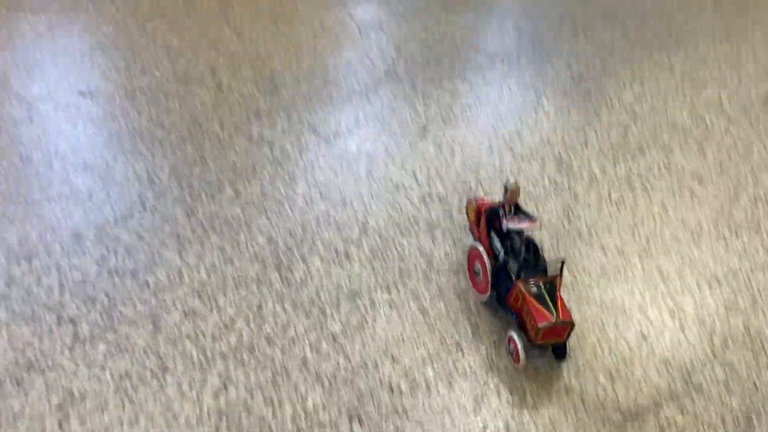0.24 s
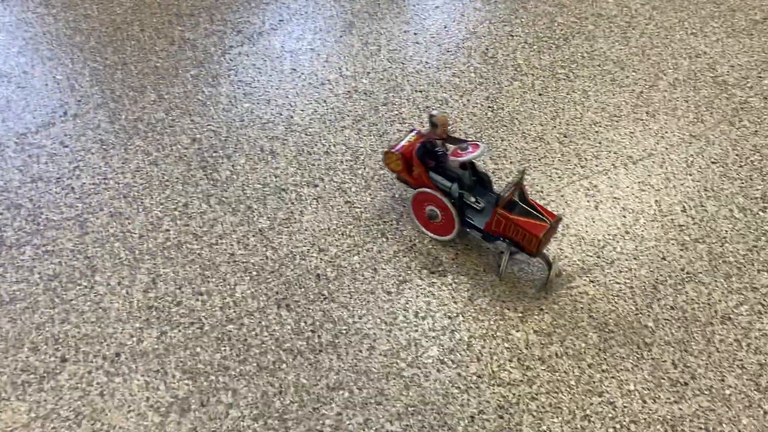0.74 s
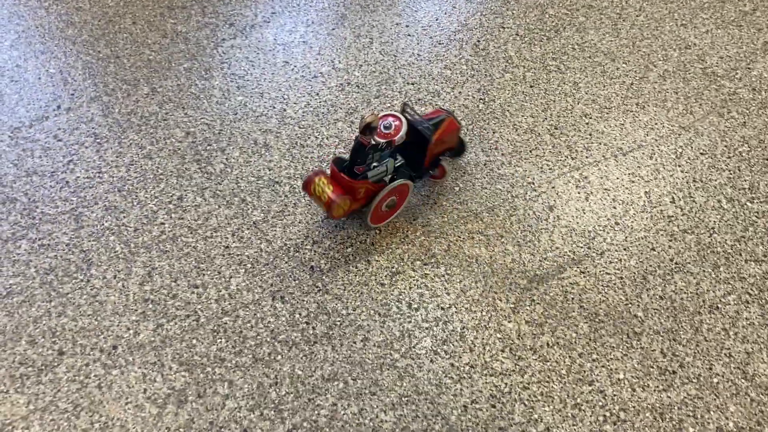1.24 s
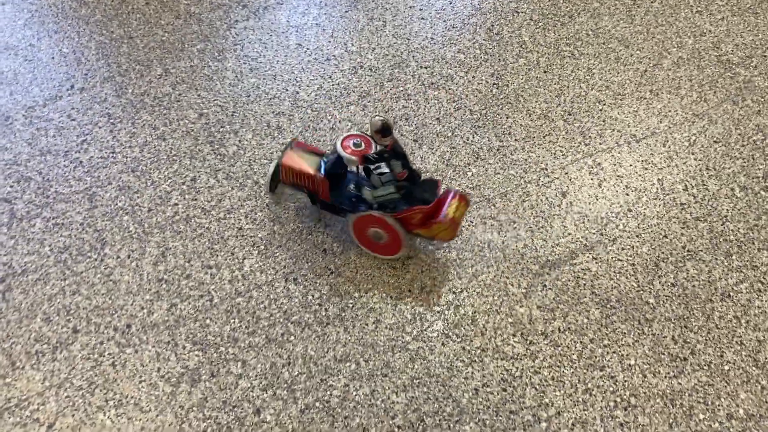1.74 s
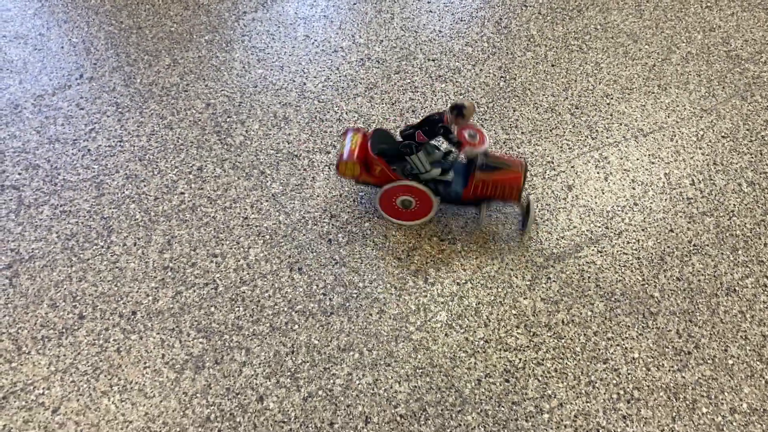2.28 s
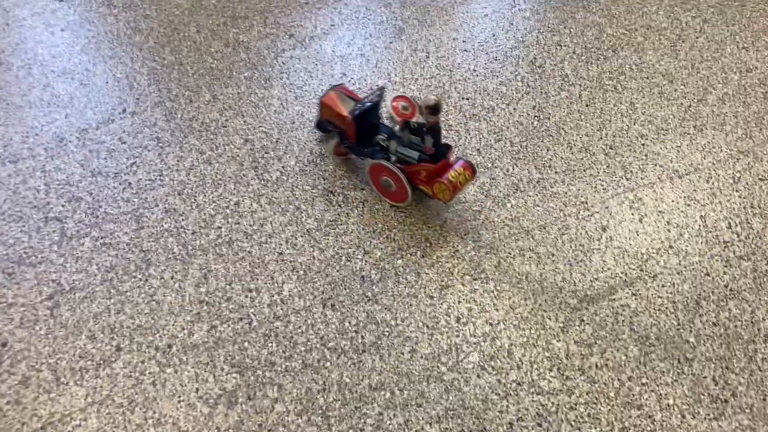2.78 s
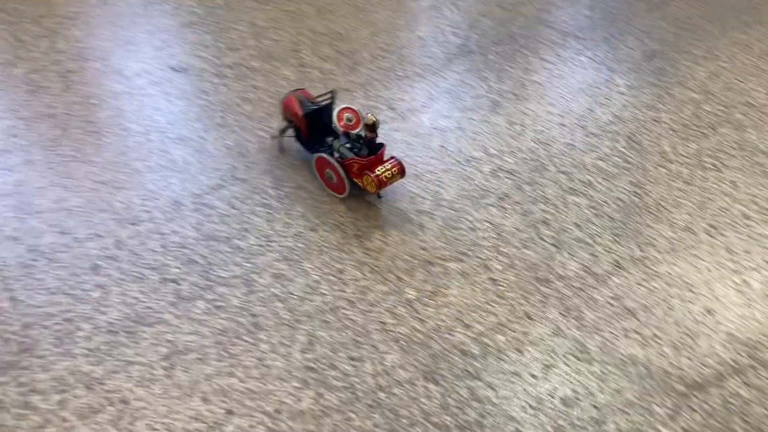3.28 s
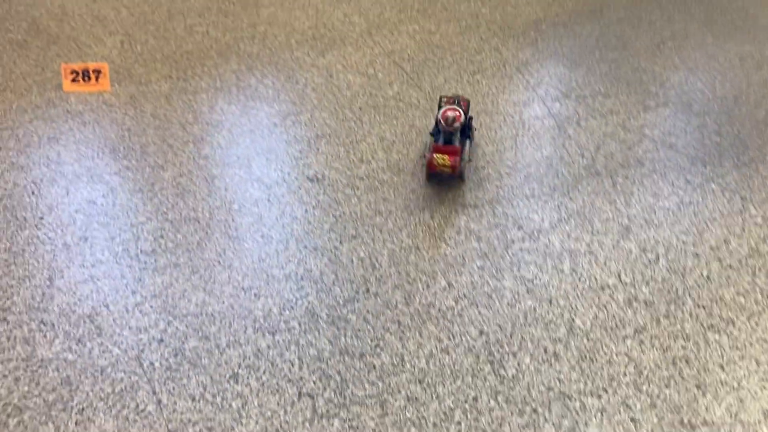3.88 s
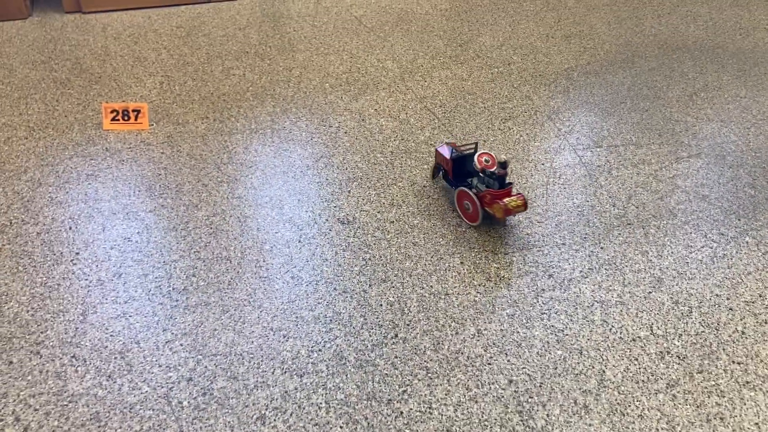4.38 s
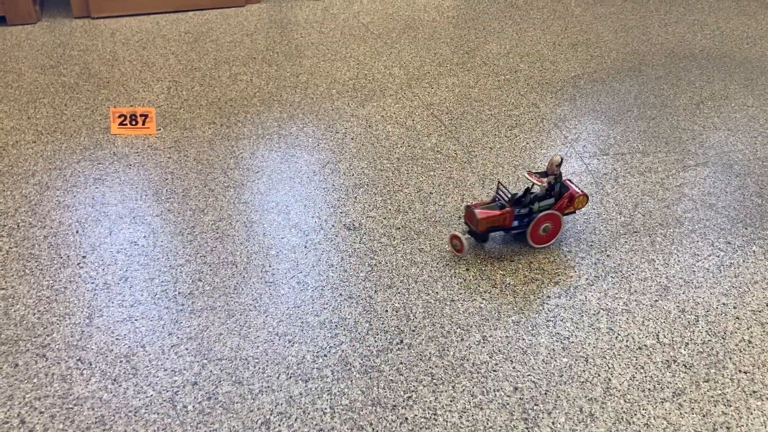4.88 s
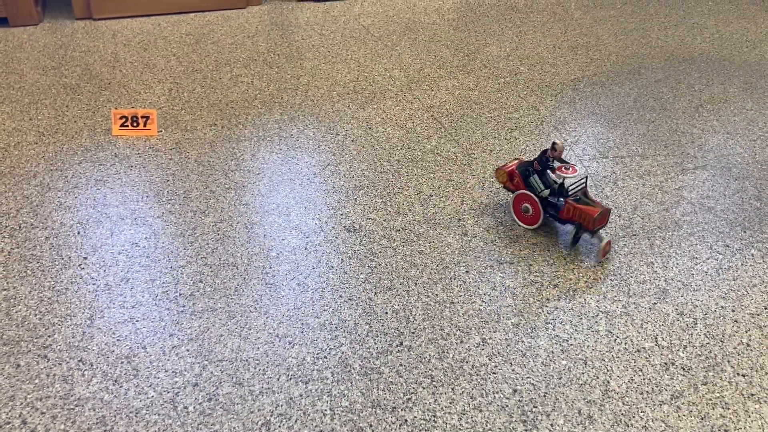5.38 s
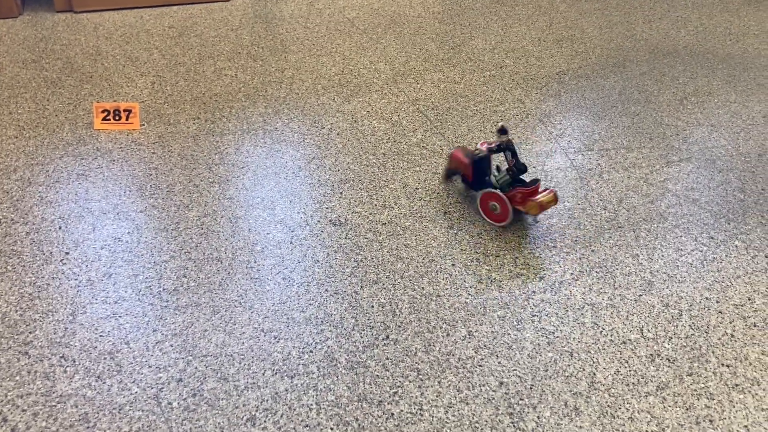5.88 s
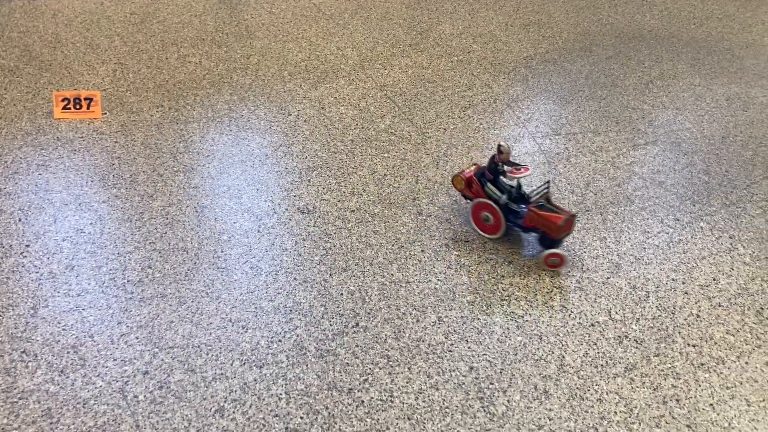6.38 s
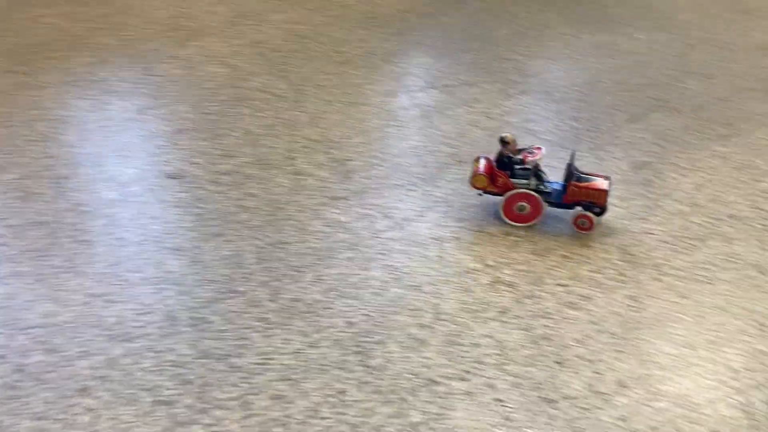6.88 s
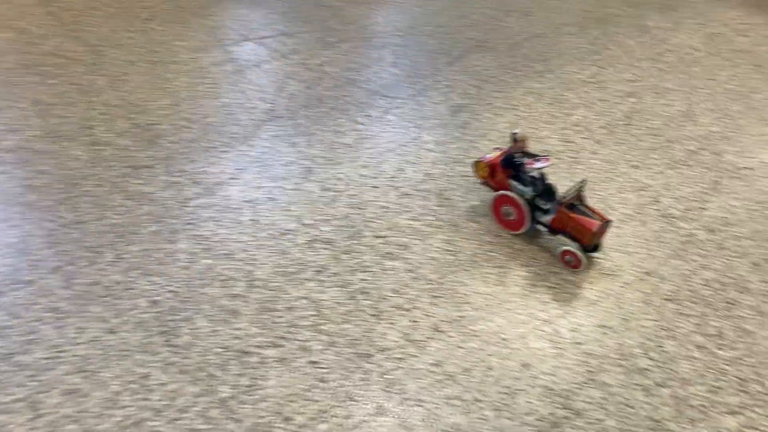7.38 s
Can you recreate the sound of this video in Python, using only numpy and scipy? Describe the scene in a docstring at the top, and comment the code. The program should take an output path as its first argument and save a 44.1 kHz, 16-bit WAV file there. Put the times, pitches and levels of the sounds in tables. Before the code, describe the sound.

Loose tin panels buzz and clockwork gears tick as a small toy car scurries around a hall, with bright clacks over faint low hum.

```python
"""A clockwork tin car scurries on a hard floor: loose panels rattle as random contacts on ringing tin, nearly
dying away midway; gears whirr and tick, their strikes driving shell resonances, and wheels grind.
Now and then the front drops with a clack, a bright crack over a body knock, and single loose parts snap.
The hall answers with a soft noise tail. Behind it are air noise, sine hums from machinery,
and a far drone with a lumpy rumble, which rises in pitch and then fades."""
import sys
import numpy as np
from scipy import signal
from scipy.fft import rfft, irfft, next_fast_len
from scipy.io import wavfile
from scipy.ndimage import uniform_filter1d, map_coordinates

SR = 44100
rng = np.random.default_rng(int(sys.argv[2]) if len(sys.argv) > 2 else 0)


def generate_wav(signal):
    """Clip the signal to [-1, 1] and save it as 16-bit WAV at the path in sys.argv[1]."""
    frames = np.transpose(np.atleast_2d(signal))
    scaled = np.clip(frames, -1, 1) * 32767
    pcm = np.round(scaled).astype(np.int16)
    wavfile.write(sys.argv[1], SR, pcm)


N = 336902  # samples

# colour of loose tin panels, rattling or snapping: (frequency [Hz], relative level [dB])
PANEL_COLOUR = [(1000, -31), (3000, -18), (4500, -18), (5400, -10), (6200, -16), (6900, -2.5), (7700, -3),
                (8600, 1), (9400, -9), (11000, -0.5), (12200, -7), (12700, -10.5), (14200, -29),
                (15200, -9.5), (15900, -10)]
# colour of the body's knock: (frequency [Hz], relative level [dB])
KNOCK_COLOUR = [(250, -18.5), (700, -27), (1100, -7), (1800, 0.5), (2500, -1), (3400, 1.5), (4800, 5),
                (6000, -1), (8000, -27), (14000, -44)]
# far drone: (time [s], pitch [Hz], level [dB], octave relative to it [dB])
FAR_DRONE = [(0, 72.3, -70, -16), (.45, 70.6, -48, -19), (1.2, 73.57, -49, -13), (2, 73.7, -47, -21),
             (2.9, 77.24, -49.5, -16.5), (3.45, 77.8, -45, -11.5), (3.65, 80, -59, 2.5),
             (3.9, 79, -85, 5.5)]


def amp(db):
    """Decibels to gain."""
    return 10 ** (np.asarray(db) / 20)


def unit(x):
    """Scaled to rms 1."""
    return x / np.sqrt(np.mean(x ** 2) + 1e-20)


def along(points, hz):
    """(Hz, value) points read on a log frequency axis."""
    f, v = np.transpose(points)
    return np.interp(np.log(hz + 1), np.log(f + 1), v)


def curves(rows):
    """One value per sample for each column after the time."""
    s, *cols = np.transpose(rows)
    return [np.interp(np.arange(N) / SR, s, c) for c in cols]


def wobble(rate):
    """A smooth random curve, rate knots a second."""
    knots = rng.standard_normal(int(N * rate / SR) + 4)
    return map_coordinates(knots, [np.arange(N) * rate / SR])


def coloured(x, spectrum):
    """Causal, minimum-phase filter with the given spectrum; white noise keeps its power."""
    size = 2 * next_fast_len(N // 2 + 8192)
    gain = unit(amp(along(spectrum, np.fft.rfftfreq(size, 1 / SR))))
    cepstrum = irfft(np.log(gain))
    # folding the cepstrum onto positive time makes the filter causal
    cepstrum[1:size // 2] *= 2
    cepstrum[size // 2 + 1:] = 0
    response = np.exp(rfft(cepstrum))
    return irfft(rfft(x, size) * response, size)[..., :N]


def add(track, s, sound):
    """Mix a sound into a track at time s."""
    start = max(round(s * SR), 0)
    part = track[:, start:start + sound.shape[1]]
    part += sound[:, :part.shape[1]]


def held(s, length):
    """An envelope that rises quickly, holds and dies away."""
    attack_s, release_s = 0.0051, 0.093
    t = np.arange(N) / SR
    rise = np.clip((t - s) / attack_s, 0, 1)
    fall = np.clip((s + length - t) / release_s + .5, 0, 1)  # half way down at the end of the length
    return rise * fall


def running(shake_db, roll_db):
    """Shaking makes the panels louder and denser; with rolling it drives the gears; rolling alone the wheels."""
    panels_db, gears_db, wheels_db = -42, -52, -60.5  # each part in ordinary running, before the lifts
    panel_lift, gear_lift = lurches()
    jolt_db = -0.13 * wobble(23)  # random unevenness, 23 knots a second
    rattle_db = shake_db + panel_lift + jolt_db
    whirr_db = 0.34 * shake_db + 0.93 * roll_db + gear_lift + jolt_db
    contacts = 250 * amp(.25 * rattle_db)  # contacts a second
    parts = (amp(panels_db + rattle_db) * loose_panels(contacts)
             + amp(gears_db + whirr_db) * gear_train(contacts, shake_db)
             + amp(wheels_db + 1.06 * roll_db) * grinding_wheels())
    return spinning(parts, depth_db=2.0)


def loose_panels(contacts):
    """Loose panels tap the body at random, in contacts of very uneven size."""
    taps = chatter(contacts, scatter_db=4.8, clump_db=3, crack_t60=0.0046,
                   shiver_db=-14, ring_db=-29, count=14)
    return coloured(taps, PANEL_COLOUR)


def gear_train(contacts, shake_db):
    """Meshing gears whirr in dense, even contacts; each tooth ticks, and the strikes set the shell singing."""
    # colours of the mesh and of the ticks: (frequency [Hz], relative level [dB])
    whirr_colour = [(500, -26.5), (900, -9), (1250, -7), (1650, -2), (1950, -0.5), (2330, -6), (2600, -1),
                    (3100, -5), (3600, -10), (4300, -5), (5400, -10), (6200, -10.5), (8000, -14),
                    (14000, -48)]
    tick_colour = [(600, -19.5), (1200, -5.5), (1900, -2.5), (2350, -2), (3400, -3), (4400, -8),
                   (5400, -2.5), (6500, -11), (9000, 3), (14000, -25)]
    mesh = chatter(1.4 * contacts, scatter_db=1.5, clump_db=0.0, crack_t60=0.0031,
                   shiver_db=-10.5, ring_db=-30.5, count=10)
    at, size, shape = tooth_strikes()
    # the teeth strike more softly as the shaking dies
    tick_gain = amp(-1.5 + 0.067 * shake_db)
    ticking = tick_gain * coloured(teeth(at, size, shape, count=16), tick_colour)
    return amp(0.04) * coloured(mesh, whirr_colour) + ticking + singing(at, size)


def tooth_strikes():
    """Worn gear teeth catch one after another, nearly evenly: sample, size and shape of each strike."""
    rate = 96  # strikes a second, about which the speed wavers
    slip_share, scatter_db = .15, 5  # timing scatter (share of a tooth), size scatter
    turned = np.cumsum(rate * amp(1.5 * wobble(5))) / SR
    at = np.flatnonzero(np.diff(np.floor(turned)))
    slip, size, shape = rng.standard_normal((len(at), 3)).T
    at = np.clip(at + slip_share * slip * SR / rate, 0, N - 1).astype(int)
    return at, unit(amp(scatter_db * np.clip(size, -2, 1.6))), shape


def teeth(at, size, shape, count):
    """The crisp tick of each tooth against the tin, in count shapes; rms 1."""
    out = np.zeros((2, N))
    for group in np.array_split(np.argsort(shape), count):
        tick = strike(crack_t60=0.0087, shiver_db=-22, ring_db=-30, rise=0.0002)
        impulses = np.bincount(at[group], size[group], N)
        out += signal.oaconvolve(impulses[None], tick, axes=1)[:, :N]
    return unit(out)


def singing(at, size):
    """The noisy buzz of the tooth strikes drives the shell's resonances, each for a stretch."""
    # shell resonances: (start [s], length [s], pitch [Hz], width [Hz], level within the gears [dB])
    resonances = [(0.831, 1.7, 3440, 480, -1), (0.897, 1.6, 2900, 250, -9.5), (0.897, 1.5, 1120, 110, -10),
                  (1.6, 0.84, 1650, 170, -10.5), (0.829, 1.76, 1955, 110, -17), (2.75, 0.73, 925, 221, -8),
                  (3.003, 4.35, 1986, 90, -13), (3.88, 0.91, 1270, 79, -6), (4.3, 1.4, 1660, 171, -12),
                  (4.34, 0.49, 3450, 550, -3), (4.939, 0.25, 2700, 330, -3), (4.939, 0.18, 1940, 130, -8),
                  (5.15, 1.9, 2910, 380, -8), (4.94, 1.4, 1067, 120, -9.5), (5.2, 0.78, 3640, 250, -5)]
    buzz_s, steady_drive = .0018, .08  # decay time constant of a strike's buzz; drive between strikes
    buzz = signal.lfilter([1], [1, -np.exp(-1 / (buzz_s * SR))], np.bincount(at, size, N))
    drive = (buzz + steady_drive) * rng.standard_normal((2, N))
    out = np.zeros((2, N))
    for s, length, hz, width_hz, db in resonances:
        edges = [hz - width_hz / 2, hz + width_hz / 2]
        band = signal.butter(2, edges, "bandpass", fs=SR, output="sos")
        out += amp(db) * held(s, length) * unit(signal.sosfilt(band, drive))
    return out


def grinding_wheels():
    """Wheels on the floor's grain: dense uneven contacts with a longer, darker crack."""
    # colour of the wheels: (frequency [Hz], relative level [dB])
    grind_colour = [(250, -20), (560, -5.5), (700, -2), (810, 0), (1120, -0.5), (1350, -2.5), (2500, -24.5),
                    (6000, -59)]
    grains = chatter(900, scatter_db=5.5, clump_db=2.5, crack_t60=0.025,
                     shiver_db=-13, ring_db=-32.0, count=5)
    return coloured(grains, grind_colour)


def lurches():
    """The car lurches and its parts flare up, or they catch: lift in dB of the panels and the gears."""
    # lurches, negative where parts catch: (start [s], length [s], panel lift [dB], gear lift [dB])
    flares = [(0.053, 0.15, 3, 5), (0.78, 0.055, -13.5, 1), (0.827, 0.19, 3.5, 7.5), (1.033, 0.12, 5, 6),
              (2.321, 0.21, 6.5, 3), (2.614, 0.32, 1, -4.5), (3.059, 0.069, 5, 0), (3.534, 0.31, 5.5, 4.5),
              (3.979, 0.17, 14.5, 5.5), (4.135, 0.23, -4.5, -4.5), (4.343, 0.13, 8.5, 6),
              (4.498, 0.21, 10, 3.5), (4.844, 0.058, -18.5, -10), (4.92, 0.22, 2.5, 4), (5.72, 0.22, 3, 3),
              (6.032, 0.23, 5.5, 1.5), (6.586, 0.064, 2.5, 6.5), (6.723, 0.24, 0, 0), (7.179, 0.18, 5, 4.5)]
    return sum(np.outer(lift_db, held(s, length)) for s, length, *lift_db in flares)


def spinning(x, depth_db):
    """As the car jolts and turns, other faces point at the listener: the colour shifts in random patches."""
    z = signal.stft(x, nperseg=256)[2]
    field = rng.standard_normal(z.shape[1:])
    for _ in range(2):  # smooth across frequency, then time
        field = uniform_filter1d(field, size=4, axis=0)
        field = uniform_filter1d(field, size=9, axis=1)
    gain = amp(depth_db * np.clip(unit(field), -2, 2))
    return signal.istft(z * unit(gain), nperseg=256)[1][:, :N]


def chatter(rate, scatter_db, clump_db, crack_t60, shiver_db, ring_db, count):
    """Random contacts of uneven size at count spots of the shell, rate a second in all; rms 1."""
    out = np.zeros((2, N))
    clumps = amp(clump_db * np.tanh(wobble(70)))  # contacts come in stronger and weaker runs
    for _ in range(count):
        taps = (rng.random(N) < rate / count / SR) / np.sqrt(rate)  # denser is not louder
        sizes = clumps * amp(scatter_db * np.clip(rng.standard_normal(N), -2, 1.6))
        spot = strike(crack_t60, shiver_db=shiver_db, ring_db=ring_db, rise=0.00049)
        out += signal.oaconvolve((taps * sizes)[None], spot, axes=1)[:, :N]
    return unit(out)


def strike(crack_t60, shiver_db, ring_db, rise):
    """One contact on tin, heard along two paths: a noise crack, a noise shiver for dense modes, a ring."""
    # ringing of the tin shell: (pitch [Hz], relative level [dB], t60 [s])
    tin_modes = [(1050, -3.5, 0.06), (1696, 2, 0.033), (2014, 5.5, 0.042), (2980, 2, 0.034),
                 (3310, 3, 0.054), (3690, -1, 0.17), (4480, -8, 0.0342), (6900, 11, 0.013),
                 (7400, -4, 0.058), (8710, 7, 0.084), (11250, 2, 0.055), (11940, 6, 0.049),
                 (14800, -8.5, .05)]
    t = np.arange(SR // 10) / SR
    hz, db, t60 = np.transpose(tin_modes)[:, :, None]
    strength = amp(db + 3.0 * rng.standard_normal(hz.shape))  # each spot wakes other modes
    turns = hz * (1 + 0.0071 * rng.standard_normal(hz.shape)) * t
    modes = strength * amp(-60 * t / t60) * np.exp(2j * np.pi * turns)
    phases = np.exp(2j * np.pi * rng.random((2, len(tin_modes))))
    ring = (phases @ modes).real
    shiver = amp(shiver_db - 60 * t / .08)
    burst = rng.standard_normal((2, len(t))) * (amp(-60 * t / crack_t60) + shiver)
    return (burst + amp(ring_db) * ring) * (1 - np.exp(-t / rise))


def clacks():
    """Landings: a bright crack from the panels over a knock from the chassis; body and struck part ring."""
    # chassis hits the floor, hard or lightly: (time [s], relative crack level [dB],
    # relative knock level [dB], pitch of the struck part [Hz], its ring level [dB], its t60 [s])
    landings = [(0.0457, -18.5, -23.5, 1990, -21.5, 0.042), (0.067, -21.5, -25, 2840, -28, 0.043),
                (0.0765, -13.5, -26.5, 1600, -36, .05), (0.103, -33, -40, 3150, -33, .04),
                (0.1224, -12, -24, 7600, -19.5, 0.087), (0.129, -27, -32, 2040, -37, .05),
                (0.18, -28, -35, 3080, -30, 0.04), (0.2082, -10.5, -22.5, 3050, -11.5, 0.022),
                (0.4293, -12, -24, 4650, -16.5, 0.013), (0.679, -41.5, -49, 2100, -46, 0.033),
                (0.8329, -41, -48, 3403, -46, 0.027), (0.8618, -38, -49, 2100, -44, .03),
                (2.3756, -13.5, -27, 3430, -21.5, 0.026), (2.403, -12.5, -25, 1750, -29.5, .044),
                (2.416, -29, -30, 3450, -34, 0.046), (2.588, -29, -38, 3736, -39, .04),
                (2.721, -33, -37.5, 3356, -39.5, 0.052), (2.943, -26.5, -30.5, 1660, -36, 0.055),
                (2.9526, -29, -41, 3202, -27.5, 0.05), (2.956, -28, -34, 3860, -29, .024),
                (3.5412, -12, -30, 3590, -23, .045), (3.553, -15.5, -28.5, 3470, -23, .035),
                (3.567, -24.5, -35, 4140, -28, .03), (3.606, -14.5, -26.5, 1970, -40, .054),
                (3.62, -25, -33, 1980, -33, 0.033), (3.6688, -13.5, -28.5, 5600, -24.5, 0.025),
                (3.865, -44, -50, 3580, -44, 0.028), (3.9978, -44, -51.5, 4300, -48, 0.025),
                (4.4106, -46, -49.5, 3700, -44.5, .04), (4.6566, -35, -48, 3560, -41.5, 0.027),
                (4.815, -42, -54, 4350, -46, .03), (4.944, -42, -46.5, 2660, -43, 0.027),
                (5.085, -45, -43, 2800, -39, .03), (5.25, -41.5, -44, 1910, -43, .03),
                (5.735, -43.5, -46, 2750, -32, 0.027), (5.797, -46, -42, 1900, -38, .03),
                (6.0373, -16, -29, 2880, -26, .028), (6.0662, -16.5, -28, 2880, -30, 0.032),
                (6.592, -30.5, -36, 3800, -38, 0.027), (6.606, -34, -36, 3460, -34, .03),
                (6.67, -40, -41, 3500, -36, .03), (6.721, -48, -46, 2950, -37, .03),
                (6.817, -37, -38, 1990, -33, .03), (7.1858, -21.5, -27.5, 3580, -22, 0.041),
                (7.199, -21.5, -27, 4070, -22, 0.034), (7.228, -27, -32, 1810, -32, .08)]
    # colour of the crack: (frequency [Hz], relative level [dB])
    crack_colour = [(2000, -26.5), (5600, -12.5), (6400, -2), (9000, -2), (11500, 1), (13500, -15.5),
                    (15500, 1)]
    spread = .07  # the struck part's modes lie within this share of its pitch
    cracks, knocks, rings = np.zeros((3, 2, N))
    for s, crack_db, knock_db, part_hz, ring_db, ring_t60 in landings:
        part = cluster(part_hz * (1 - spread), part_hz * (1 + spread), ring_t60, count=4)
        clang = cluster(1198, 6590, t60=0.044, count=16)  # the whole body
        crack = strike(crack_t60=0.011, shiver_db=-17.5, ring_db=-36, rise=0.00049)
        knock = strike(crack_t60=0.008, shiver_db=-14, ring_db=-28, rise=0.0003)
        add(cracks, s + 0.0002, amp(crack_db + 7.5) * crack)
        add(knocks, s + 0.00022, amp(knock_db + 5.5) * knock)
        add(rings, s, amp(ring_db) * part + amp(knock_db - 5.5) * clang)
    return coloured(cracks, crack_colour) + coloured(knocks, KNOCK_COLOUR) + rings


def cluster(low_hz, high_hz, t60, count):
    """Struck tin, heard along two paths: count uneven modes between two pitches die away together."""
    t = np.arange(SR // 8) / SR
    place = (np.arange(count) + rng.random(count)) / count
    hz = low_hz * (high_hz / low_hz) ** place
    strength = unit(amp(2.3 * rng.standard_normal(count))) / np.sqrt(count)
    weights = strength * np.exp(2j * np.pi * rng.random((2, count)))
    ring = (weights @ np.exp(2j * np.pi * np.outer(hz, t))).real
    return ring * amp(-60 * t / t60) * (1 - np.exp(-t / 0.00021))


def ticks(shake_db):
    """Loose parts snap against the body in short buzzes; lesser random snaps follow the shaking."""
    # single snaps: (time [s], relative level [dB])
    single_snaps = [(0.992, -40.5), (1.044, -28.5), (1.082, -29), (1.104, -27), (1.128, -29.5),
                    (1.162, -27), (1.2349, -27), (1.739, -29), (1.756, -26), (1.803, -28.5),
                    (2.8176, -25.5), (2.836, -29), (2.873, -29), (2.928, -23.5), (3.092, -26.5),
                    (4.0407, -48), (4.5505, -42), (4.5879, -38.5), (4.767, -43.5), (4.8066, -38),
                    (4.9304, -43.5), (5.0, -54), (5.0415, -36), (5.13, -36), (5.24, -32), (5.3134, -38),
                    (5.3801, -39.5), (5.476, -40), (5.548, -31), (5.629, -26.5), (5.7543, -26.5),
                    (6.3529, -28.5), (7.436, -33), (7.59, -39)]
    snaps = np.zeros((2, N))
    moments = np.flatnonzero(rng.random(N) < 11 / SR)  # lesser snaps, 11 a second on average
    lesser_db = -36 + 0.74 * shake_db[moments] + rng.standard_normal(len(moments))
    lesser = list(zip(moments / SR, lesser_db))
    for s, db in single_snaps + lesser:
        snap = strike(crack_t60=0.016, shiver_db=-18, ring_db=-41.5, rise=0.0011)
        add(snaps, s - .0005, amp(db + 5.5) * snap)
    body_answer = amp(-19) * coloured(snaps, KNOCK_COLOUR)
    return coloured(snaps, PANEL_COLOUR) + body_answer


def hall(x):
    """A diffuse tail of decaying noise whose treble dies first."""
    # decay of the hall: (frequency [Hz], t60 [s])
    decay = [(200, 0.95), (1000, 0.46), (2500, 0.35), (6000, 0.26), (14000, 0.095)]
    hz, t, z = signal.stft(rng.standard_normal((2, SR * 3 // 4)), SR, nperseg=256)
    fading = z * amp(-60 * t / along(decay, hz)[:, None])
    tail = signal.istft(fading, SR, nperseg=256)[1]
    tail = np.pad(tail / np.linalg.norm(tail[0]), ((0, 0), (SR // 200, 0)))  # starts 5 ms late
    return signal.fftconvolve(x, tail, axes=1)[:, :N]


def machinery():
    """Steady, slightly wavering hum lines of building machinery, and a far drone with its octave."""
    # hum lines: (pitch [Hz], relative level [dB])
    hum_lines = [(41.6, -71), (50.1, -61), (58.6, -40.5), (83.4, -61), (100.1, -79), (117.2, -66),
                 (148.7, -68), (174.1, -89.5)]
    t = np.arange(N) / SR
    hum = np.zeros(N)
    for hz, db in hum_lines:
        level = amp(db + 0.096 * wobble(3.28))
        hum += level * np.sin(2 * np.pi * (hz * t + rng.random()) + 0.051 * wobble(2.0))
    drone_hz, drone_db, octave_db = curves(FAR_DRONE)
    angle = 2 * np.pi * np.cumsum(drone_hz) / SR
    octave = amp(octave_db + 2.0 * wobble(5.1)) * np.sin(2 * angle + wobble(3.034))
    drone = amp(drone_db) * (np.sin(angle) + octave)
    return np.sqrt(2) * (amp(-0.14) * hum + drone)  # root 2 turns sine peak into rms level


def air():
    """Ventilation as dull filtered noise, and a lumpy noise rumble that comes and goes with the far drone."""
    # colours of the ventilation and of the rumble: (frequency [Hz], relative level [dB])
    air_colour = [(15, -32), (30, -3), (60, 8.5), (85, 4.5), (130, -3.5), (170, -4.5), (230, -9),
                  (360, -10.5), (520, -21.5), (1000, -30.5), (2000, -23.5), (4000, -39), (8000, -69),
                  (15000, -69)]
    rumble_colour = [(70, -28), (150, 3.5), (230, -5), (370, -5), (520, -34), (1000, -36.5)]
    drone_db = curves(FAR_DRONE)[1]
    rumble_gain = amp(drone_db - 14.0 + 4.1 * wobble(6))
    rumble = rumble_gain * coloured(rng.standard_normal((2, N)), rumble_colour)
    return amp(-49) * coloured(rng.standard_normal((2, N)), air_colour) + rumble


def microphones(paths):
    """Two unrelated paths become left and right, with likeness, phase and balance set by frequency."""
    # (frequency [Hz], left-right likeness, limited below to 0 to 0.995)
    likeness = [(60, 0.5), (140, 0.9), (300, 0.82), (650, 0.47), (1400, 0.52), (3000, -0.14), (5800, 0.74),
                (6800, 0.7), (9200, 4.5), (10200, -6.5), (11300, -1), (12400, 3.5), (13500, 6), (15500, 6)]
    # (frequency [Hz], phase by which left leads right [rad])
    left_lead = [(4300, 0), (5500, 3.5), (6400, -0.1), (7900, -1.5), (8700, -2.5), (9250, -3), (10100, -5),
                 (11300, -6.5), (12300, -6), (13000, -7.5), (14200, -11.5), (15200, -9)]
    # (frequency [Hz], left minus right [dB])
    balance = [(300, -0.5), (700, 2), (1500, 2.5), (3000, 2), (6000, 0)]
    size = next_fast_len(N + SR // 2)
    hz = np.fft.rfftfreq(size, 1 / SR)
    a, b = rfft(paths, size)
    turn = np.arccos(np.clip(along(likeness, hz), 0, .995)) / 2
    common, apart = a * np.cos(turn), b * np.sin(turn)
    skew = amp(along(balance, hz) / 2) * np.exp(.5j * along(left_lead, hz))
    return irfft(np.array([(common + apart) * skew, (common - apart) / skew]), size)[:, :N]


def scene():
    """The car in the humming hall; shake and roll are in dB over ordinary running."""
    # how hard the car shakes: (time [s], level [dB])
    shaking = [(0.0, -37.5), (0.08, -34.5), (0.21, -42.5), (0.57, -60.5), (0.79, -58.5), (1.19, -47),
               (1.45, -46.5), (1.81, -42), (2.57, -39.5), (3.57, -45.5), (4.09, -86), (4.32, -77.5),
               (4.64, -60.5), (5.6, -50.5), (6.21, -40.5), (6.7, -43), (7.1, -35.5), (7.19, -37),
               (7.51, -50.5), (7.64, -75)]
    # how hard the wheels run over the floor's grain: (time [s], level [dB])
    rolling = [(0.0, -44), (0.07, -53.5), (0.3, -55), (0.47, -60.5), (0.81, -68.5), (0.85, -68.5),
               (1.21, -60.5), (2.38, -56), (2.83, -57), (3.17, -57), (3.59, -52.5), (3.89, -58),
               (4.17, -65.5), (4.92, -65), (4.95, -64.5), (5.3, -61), (6.08, -56.5), (6.36, -59),
               (7.19, -48.5), (7.45, -54), (7.64, -63.5)]
    shake_db = curves(shaking)[0] + 45  # ordinary running is -45 dB
    roll_db = curves(rolling)[0] + 58  # ordinary running is -58 dB
    car = running(shake_db, roll_db) + clacks() + ticks(shake_db)
    room = microphones(car + amp(-10.5) * hall(car) + air())
    return room + machinery() * amp([[.2], [-.2]])  # the hum leans slightly left


def record(dry):
    """A steep band limit: nothing above 15.9 kHz is kept."""
    size = next_fast_len(N + SR // 2)
    kept = np.fft.rfftfreq(size, 1 / SR) < 15900
    return irfft(rfft(dry, size) * kept, size)[:, :N]


dry = scene()
out = record(dry)
generate_wav(out)
```